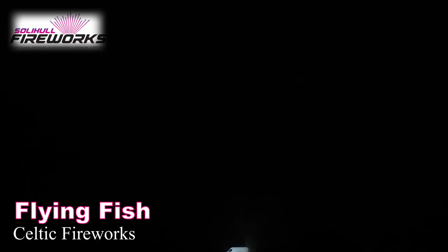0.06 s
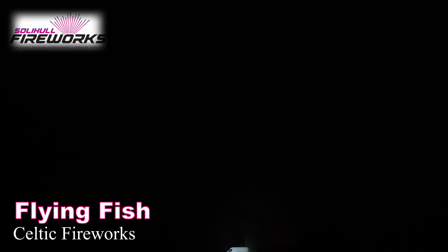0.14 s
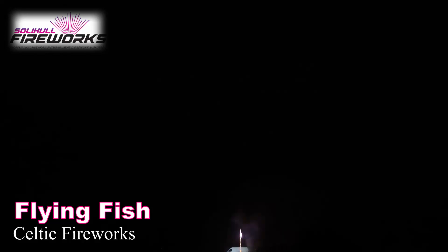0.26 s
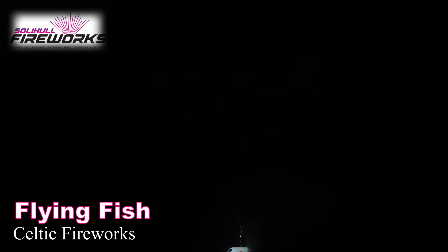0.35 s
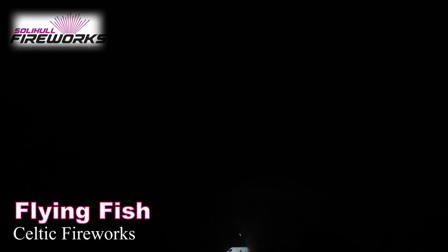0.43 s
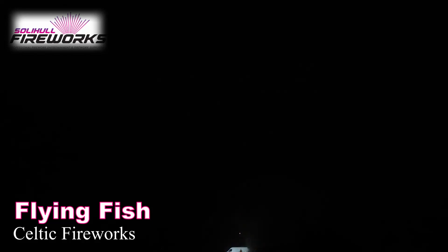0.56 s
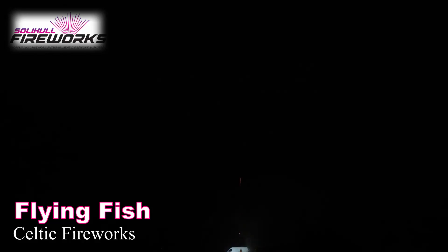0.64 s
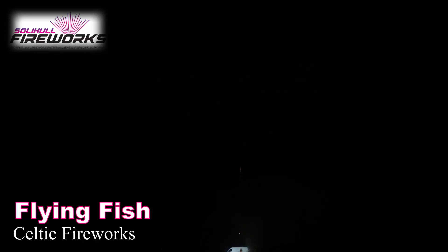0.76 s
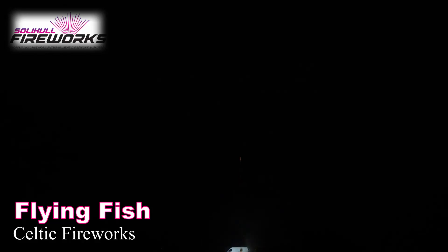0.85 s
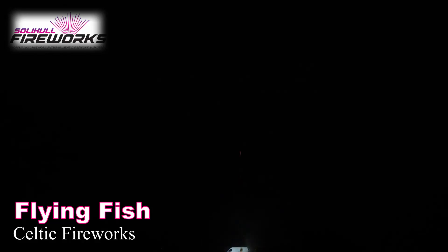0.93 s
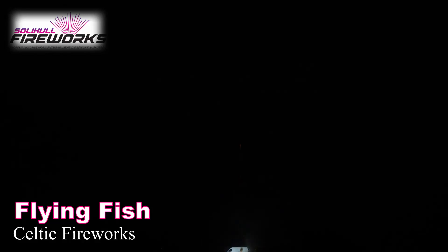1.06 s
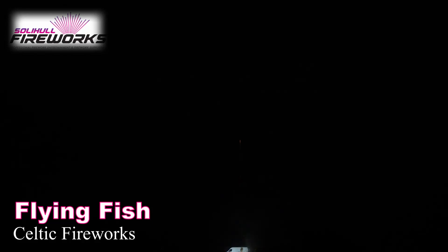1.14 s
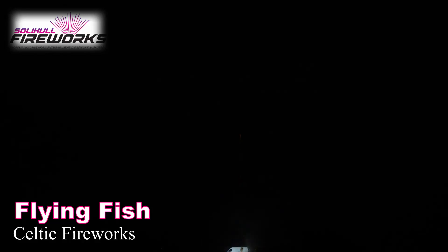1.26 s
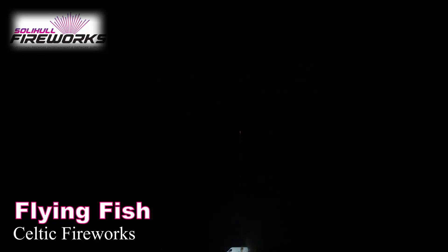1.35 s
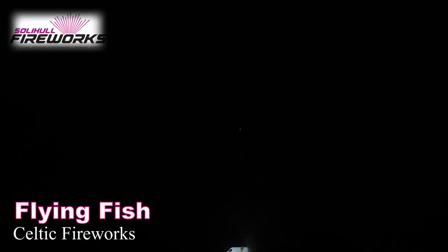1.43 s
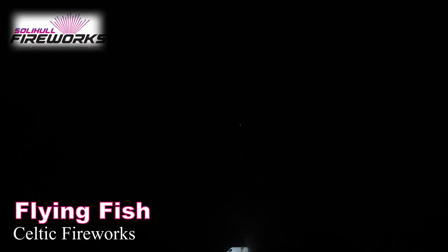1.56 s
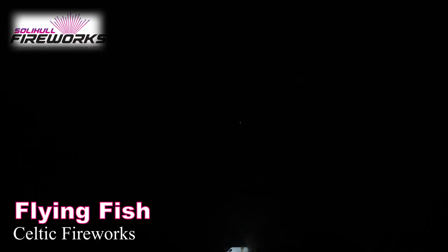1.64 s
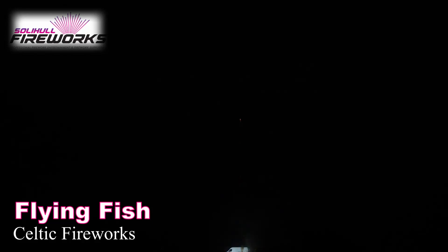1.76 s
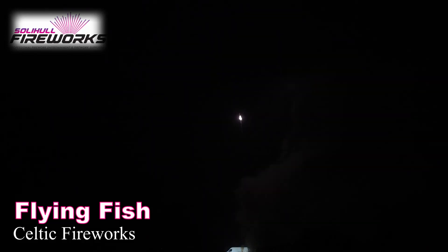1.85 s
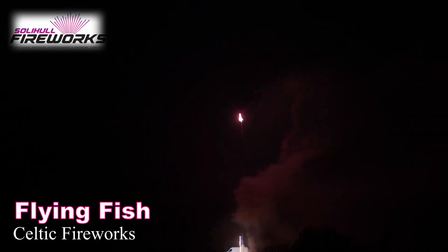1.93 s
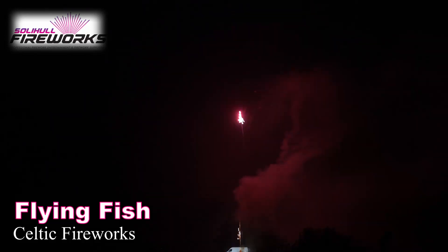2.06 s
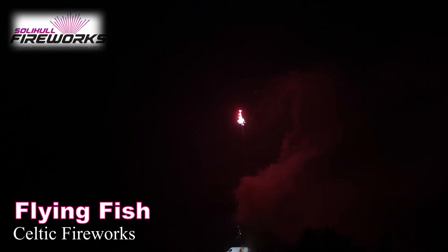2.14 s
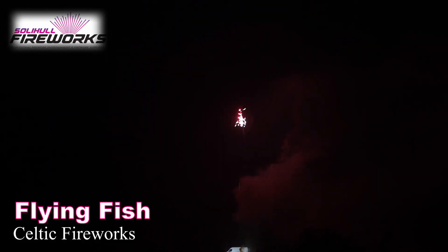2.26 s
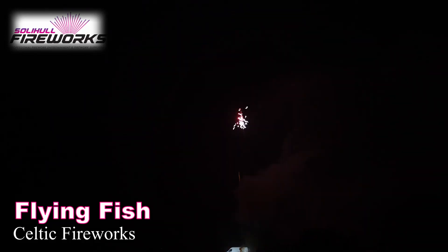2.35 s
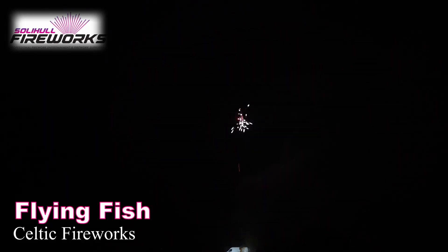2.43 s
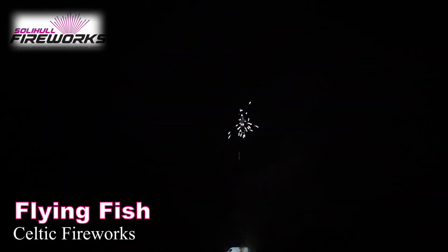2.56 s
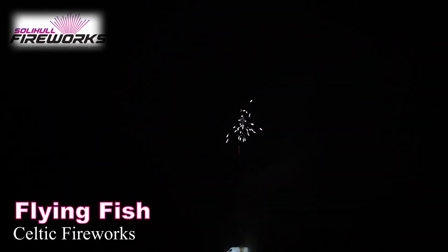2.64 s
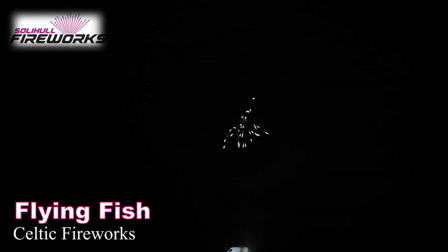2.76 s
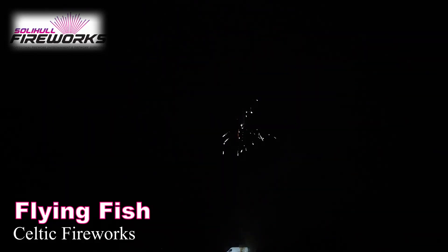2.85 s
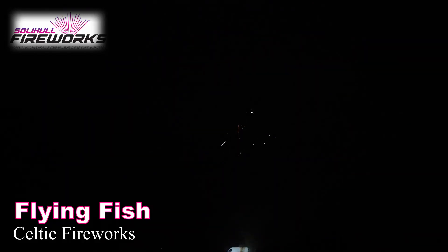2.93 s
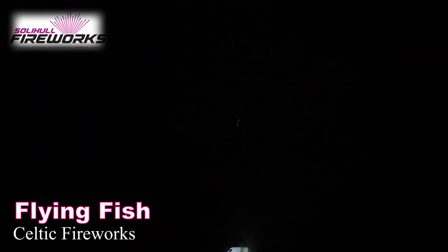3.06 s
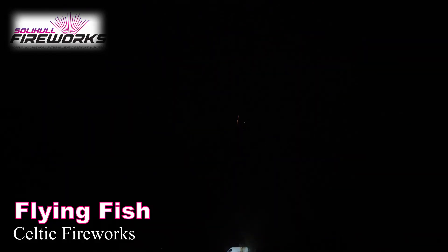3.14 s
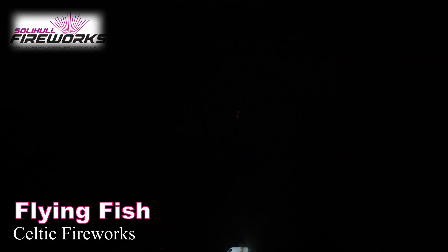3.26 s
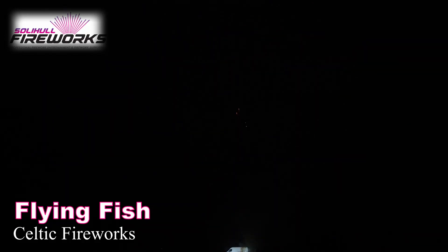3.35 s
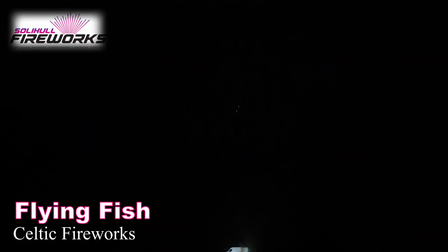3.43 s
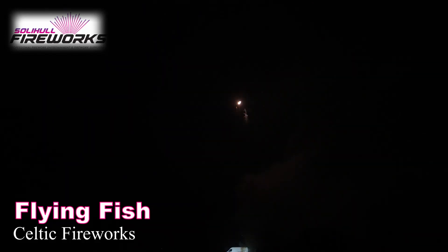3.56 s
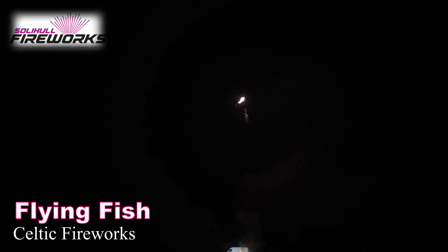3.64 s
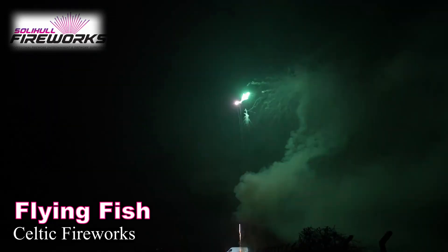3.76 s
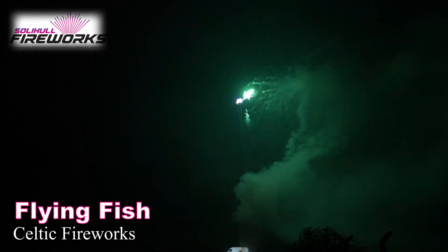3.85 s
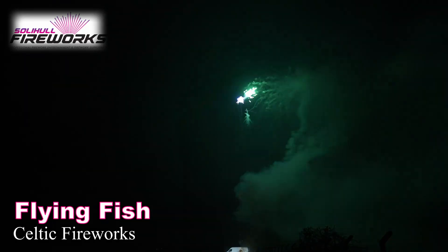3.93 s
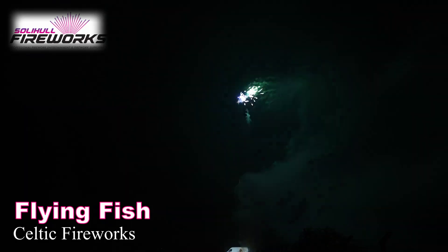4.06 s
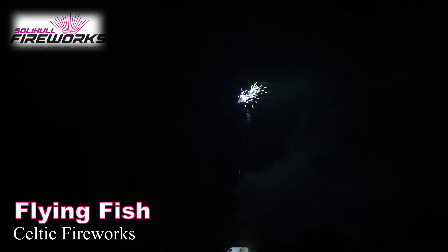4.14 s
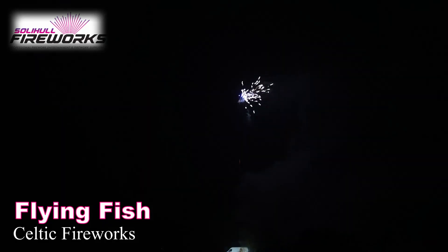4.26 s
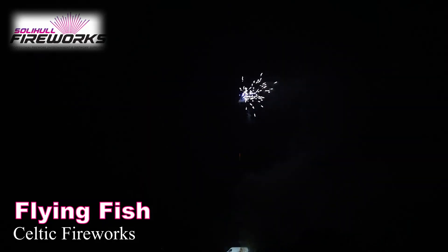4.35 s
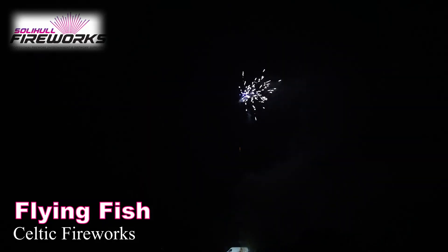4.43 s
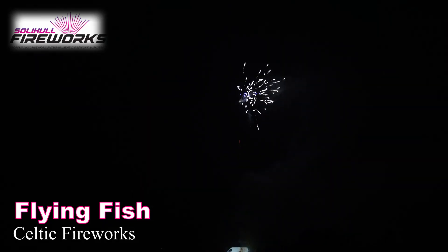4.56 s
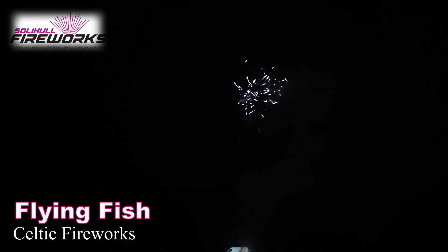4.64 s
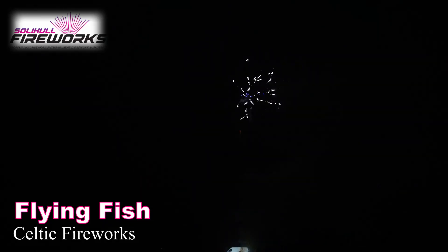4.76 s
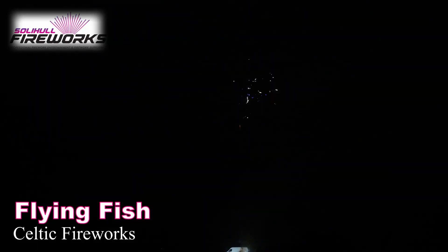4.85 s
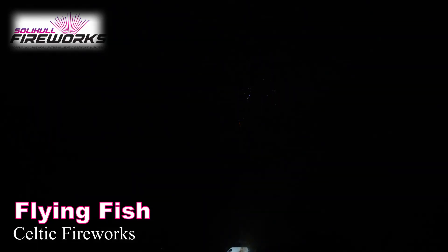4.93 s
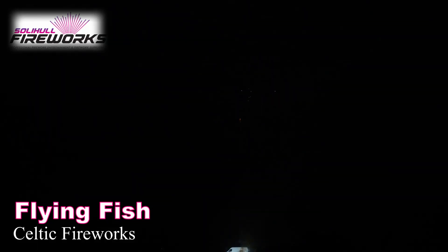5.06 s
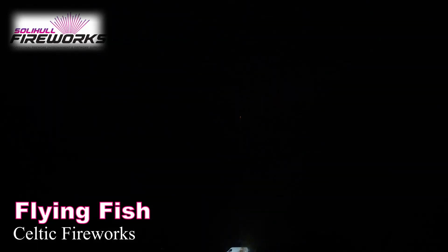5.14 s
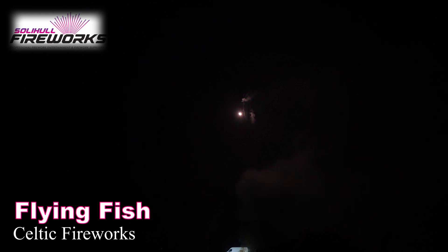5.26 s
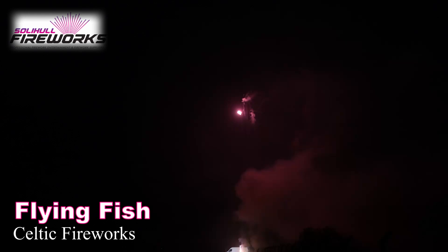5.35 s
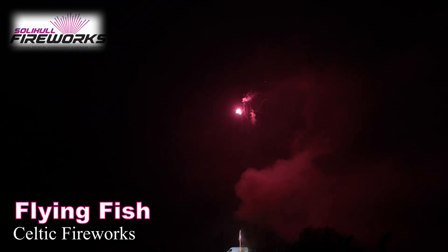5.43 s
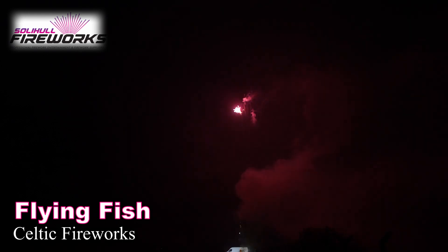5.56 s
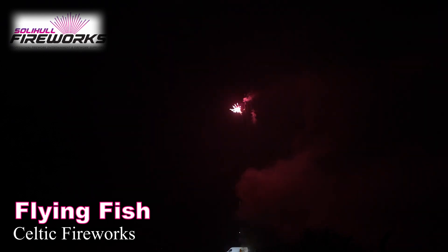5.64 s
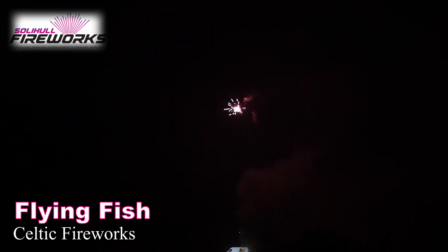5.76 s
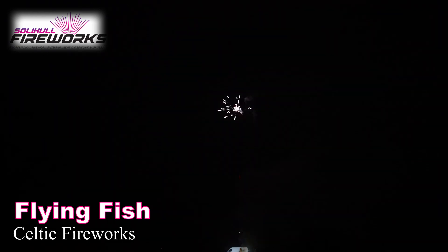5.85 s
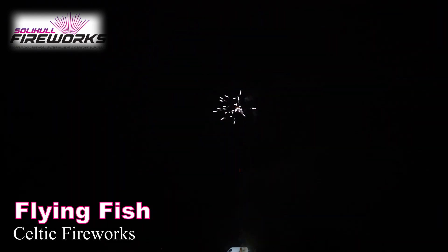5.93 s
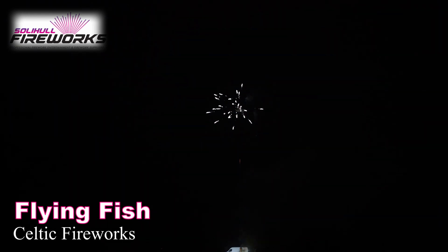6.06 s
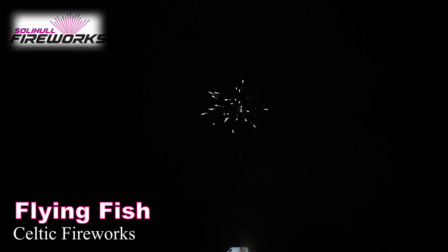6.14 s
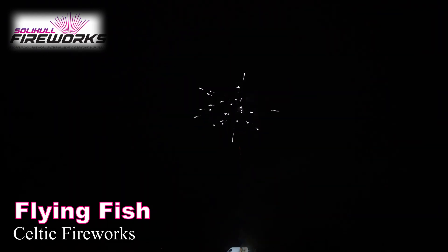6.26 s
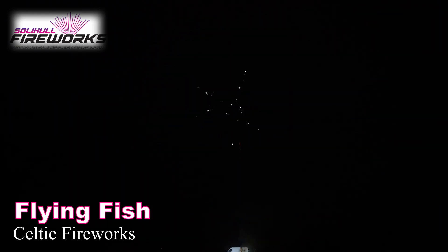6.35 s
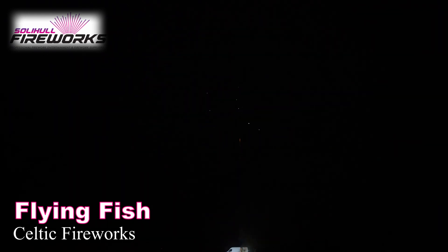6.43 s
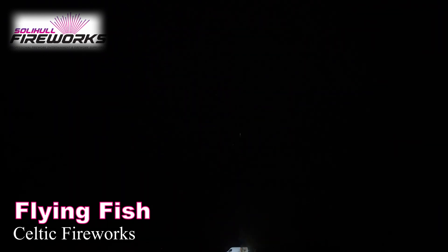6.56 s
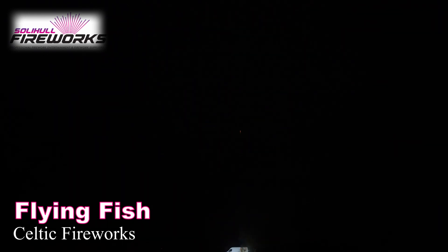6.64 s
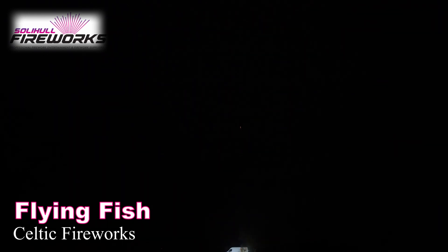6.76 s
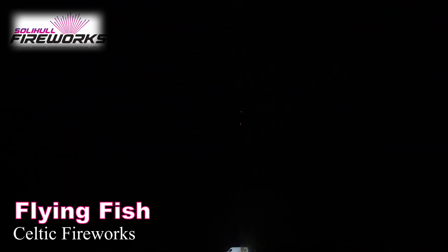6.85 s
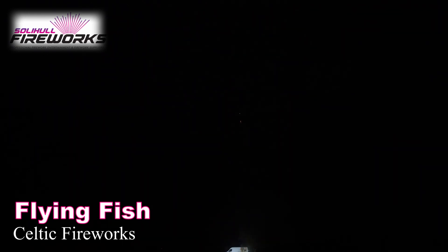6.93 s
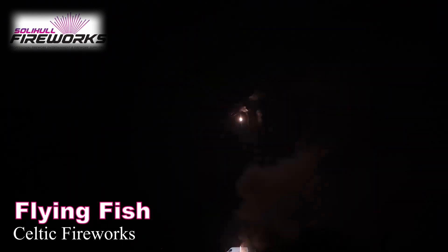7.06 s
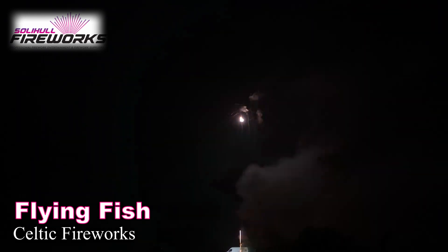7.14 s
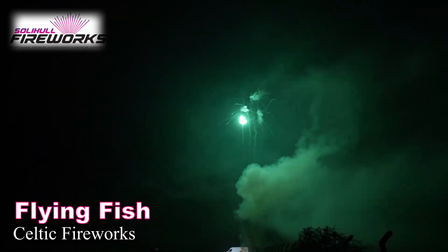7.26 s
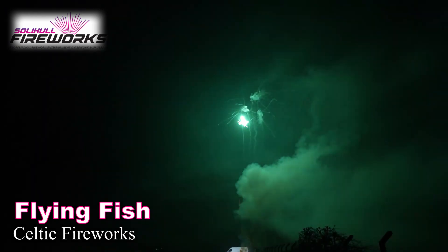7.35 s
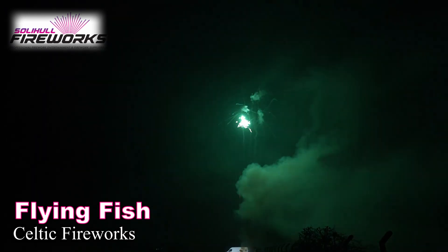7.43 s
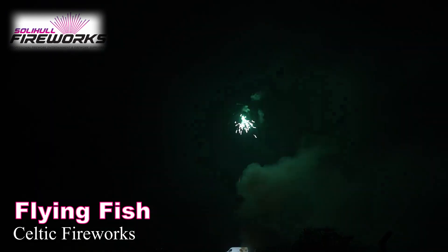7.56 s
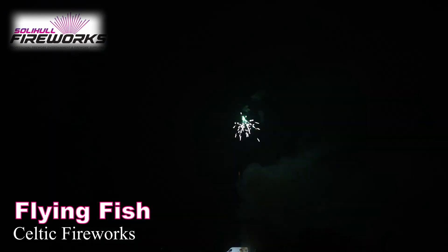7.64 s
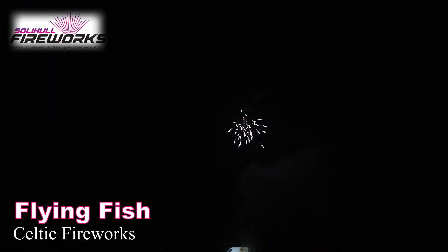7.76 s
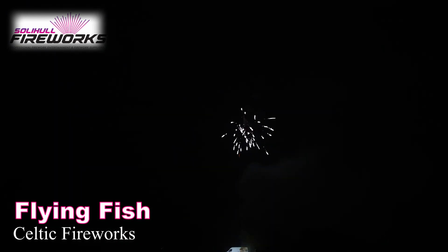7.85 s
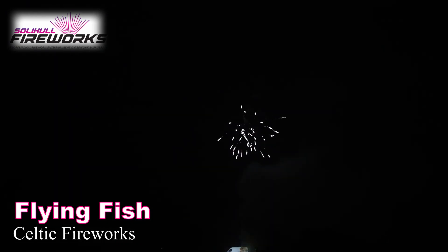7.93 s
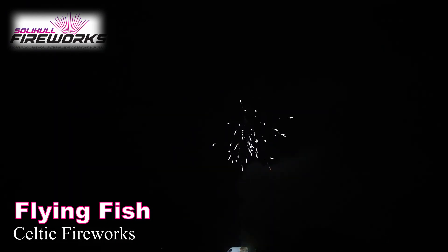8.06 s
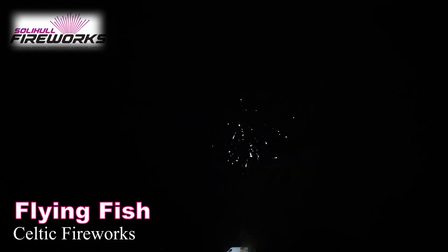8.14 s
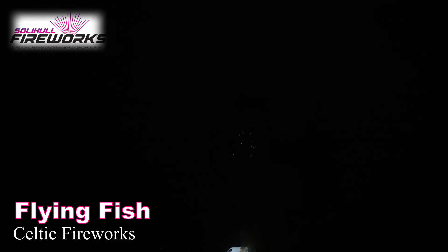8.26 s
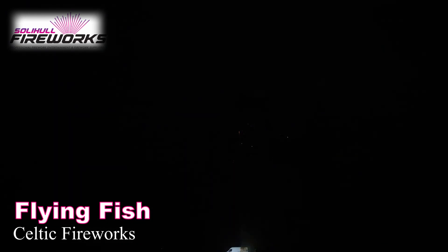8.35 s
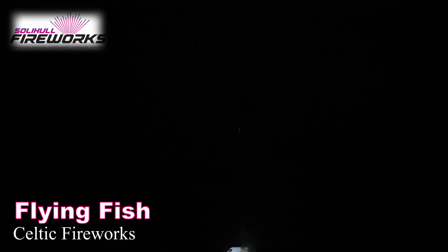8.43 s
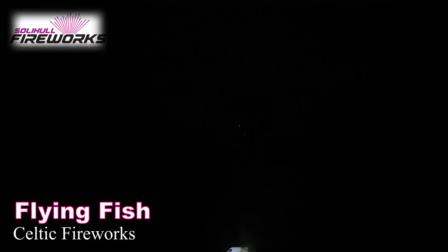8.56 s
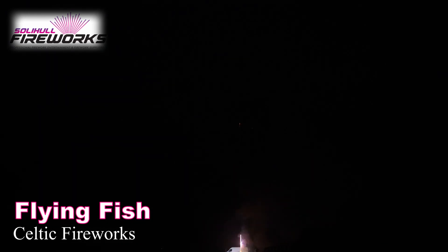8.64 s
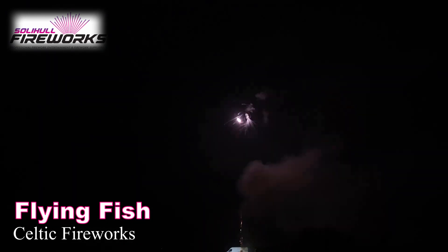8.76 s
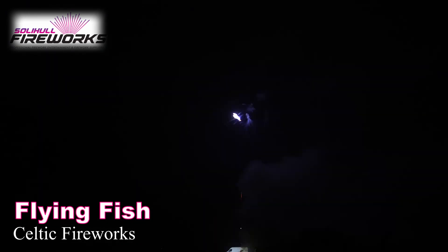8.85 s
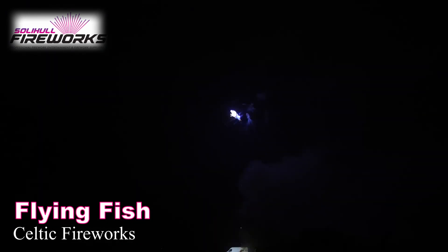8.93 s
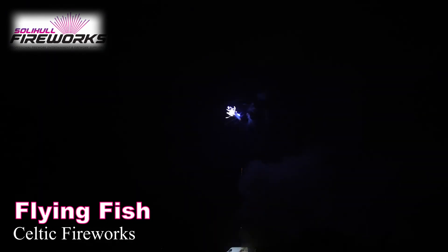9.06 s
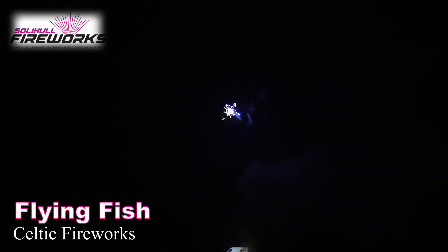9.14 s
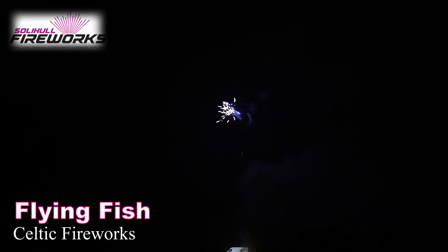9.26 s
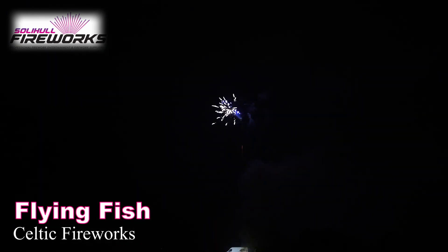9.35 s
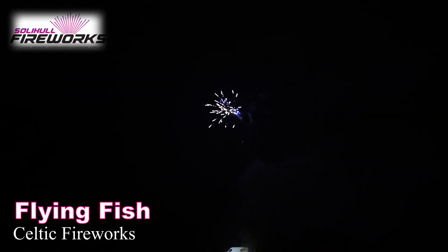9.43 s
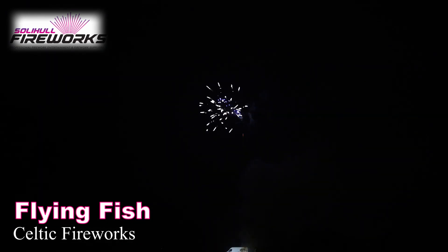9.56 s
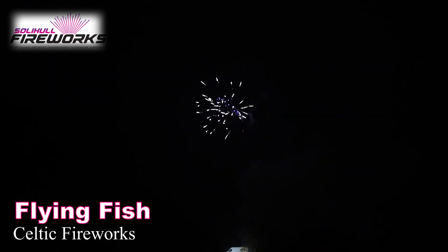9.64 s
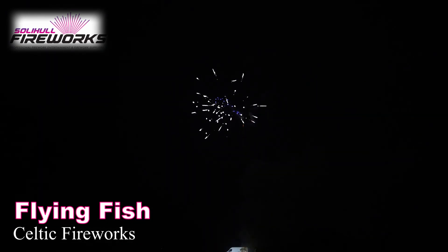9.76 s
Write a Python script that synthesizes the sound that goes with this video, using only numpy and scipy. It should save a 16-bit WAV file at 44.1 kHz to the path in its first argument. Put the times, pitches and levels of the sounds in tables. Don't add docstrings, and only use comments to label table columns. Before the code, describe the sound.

Outdoors at night, close to one overloaded microphone, a firework tube bangs abruptly and its low echo rolls away. A tight double bang follows, then single shots at regular gaps. Between them come sharp overhead pops and crisp spark hiss, once with a spinning whirr. Dull casings drop before the last boom, which leaves pure sizzling sparks and a soft ember fizz.

```python
import sys
import numpy as np
from scipy import signal
from scipy.fft import rfft, irfft, next_fast_len
from scipy.io import wavfile
from scipy.ndimage import map_coordinates

SR = 44100
rng = np.random.default_rng(int(sys.argv[2]) if len(sys.argv) > 2 else 0)


def magnitude_from_level(level_db):
    exponent = np.asarray(level_db, float) / 20
    return 10 ** exponent


def bounce(signal):
    frames = np.transpose(np.atleast_2d(signal))
    limited = np.clip(frames, -1, 1)
    pcm = np.round(limited * 32767).astype(np.int16)
    wavfile.write(sys.argv[1], SR, pcm)


N = 432180
T = np.arange(N) / SR

# freq_hz, density_db
NIGHT_COLOUR = [(12, -26), (20, -6.5), (44, -7.5), (91, -4), (123, -12), (222, -17.5), (367, -25),
                (513, -21.5), (558, -25.5), (825, -23.5), (949, -20.5), (1030, -22.5), (1400, -30.5),
                (3530, -39.5), (16000, -64.5)]
# freq_hz, density_db
EMBER_COLOUR = [(710, -34), (1200, -2), (1370, -10.5), (1730, -5), (2570, -8), (3560, -3.5), (4360, -5.5),
                (5600, -15), (9610, -29), (12000, -33), (15600, -65)]
# time_s, level_db
EMBER_LEVEL = [
    (0, -76.5),
    (2.1, -68.5),
    (3.3, -75.5),
    (3.8, -64.5),
    (5.3, -75.5),
    (6.7, -67.5),
    (7.3, -65),
    (8.45, -65.5),
    (8.8, -62),
    (9.8, -56.5),
]
# pitch_hz, level_db
WHINE = (942.1, -71.5)
# start_s, end_s, pitch_hz, level_db
HUM = (6.25, 7.25, 522.5, -60.5)
# start_s, charge_db, crack_sharpness_db
SHOTS = [
    (0.441, 1, 0),
    (2.1563, 2, -2),
    (2.2062, 3, 2),
    (3.9024, 1.5, 1),
    (5.594, 0, -1.5),
    (7.319, 0, -1),
    (8.8395, 2, -1.5),
]
# lead_s, level_db
SPIT = (.005, -46.5)
# ring_hz, decay_cycles, level_db, blast_s, blast_share
MUZZLE = (275, 2.5, 29.5, .0006, 1.56)
# delay_s, level_db, front_lost_s
WALL = (.0343, -10.7, .0009)
# delay_s, level_db, pitch_hz
NEAR_ECHOES = [(0.0068, 19.1, 335), (0.0083, 13.0, 346), (0.0143, -10.2, 182), (0.0188, -2.1, 273),
               (0.0267, -10.1, 252), (0.0369, 1.9, 191), (0.0376, -6.1, 139), (0.0488, -8.2, 228),
               (0.0503, -9.4, 329), (0.0641, -18.2, 190), (0.0725, -18.3, 188), (0.0878, -16.9, 218),
               (0.1013, -21.5, 247), (0.1113, -26.1, 248), (0.1229, -11.7, 270), (0.1243, -17.1, 417),
               (0.1345, -26.6, 172), (0.1452, -26.2, 181), (0.157, -19.3, 209), (0.1606, -25.3, 206)]
# delay_s, level_db, pitch_hz
FAR_ECHOES = [(0.2161, -43.5, 215), (0.2302, -29.5, 251.3), (0.256, -26.5, 181.8), (0.3041, -35.5, 212),
              (0.3253, -26, 224), (0.3382, -34, 250), (0.3494, -27.5, 193), (0.3832, -31.5, 150),
              (0.4152, -28.5, 248), (0.4348, -27, 232), (0.4759, -37.5, 225), (0.5342, -35.5, 188.5),
              (0.5681, -31.5, 178), (0.602, -25.5, 150), (0.6566, -32.5, 179), (0.661, -26, 255),
              (0.7288, -25, 202), (0.742, -28.5, 197), (0.7939, -37, 235), (0.8425, -37.5, 221)]
# delay_s, level_db, lowest_hz, spacing_hz, t60_s
RIBS = [
    (.0335, -7, 2100, 1300, .014),
        (.1215, -34.5, 561, 1480, 0.035),
    (.156, -40.5, 2190, 2000, 0.015),
    (.2505, -35.5, 897, 882, 0.046),
    (.6043, -30, 797, 875, 0.015),
    (.657, -46, 890.6, 890, 0.018),
    (.699, -41, 830, 890, 0.012),
]
# freq_hz, density_db
BOOM_COLOUR = [(15, -47.5), (25, -23.5), (75, -17), (150, 3.5), (237, 0), (321, -6), (424, -25.5),
               (520, -28.5), (680, -55), (1140, -120)]
# freq_hz, density_db
RUSTLE_COLOUR = [(250, -40.5), (420, -14), (542, -5.5), (613, -2), (978, -1), (1080, -2), (1310, -8),
                 (1690, -5), (1800, -7.5), (1970, -7), (2200, -10.5), (3680, -15.5), (6000, -38.5),
                 (7800, -60.5), (13200, -120)]
# freq_hz, density_db
SIZZLE_COLOUR = [(650, -39.5), (1100, -8.5), (1710, -8), (1980, -3), (2430, 2), (2750, -3.5), (3870, -2),
                 (12200, -28.5), (14700, -47), (16500, -66)]
# peak_s, rise_s, level_db, fall_db_per_s
BOOM_BACK = [
    (.06, .02, -29, 149),
    (.2, 0.078, -43, 25),
    (.39, 0.3, -44.5, 26),
]
RUSTLE_BACK = [
    (.005, .006, -20, 596),
    (0.04, .01, -31, 252),
    (0.111, .05, -57.5, 40.7),
    (0.384, 0.39, -47.5, 32),
]
SIZZLE_BACK = [
    (.006, .006, -39.5, 420),
    (.037, .004, -41.5, 280),
    (.062, .03, -42, 380),
    (.12, 0.073, -67, 25),
    (.245, 0.034, -61.5, 90),
    (.5, .3, -80.5, 5.2),
]
# start_s, peak_db
TICKS = [
    (1.1943, -41.5),
    (1.198, -48),
    (2.04, -46),
    (2.055, -49.5),
    (2.08, -48.5),
]
# freq_hz, density_db
TICK_COLOUR = [(1200, -45.0), (2000, 1), (2800, -10.5), (4000, 0.5), (5500, -15), (16000, -15.5)]
# start_s, peak_db, pulse_s, ground_delay_s
POPS = [
    (2.1056, -29, 0.00038, 0.0037),
    (2.1146, -26, 0.0018, 0.0033),
    (2.1156, -25.5, 0.00057, .004),
    (3.8365, -8, 0.000084, 0.0041),
    (3.838, -13, 0.00081, .0043),
    (3.9897, -13, 0.00031, 0.0037),
    (5.5279, -13, 0.00028, 0.004),
    (9.0019, -17.5, 0.000073, 0.0027),
    (9.0029, -17, 0.00049, 0.004),
]
# lit_s, out_s, hiss_db, whirr_rel_db
SPARKS = [
    (2.11, 3.15, -65.5, -18),
    (3.84, 5.07, -61.5, -14),
    (5.527, 6.572, -64, -19),
    (7.35, 8.366, -64.5, -2),
    (7.665, 8.39, -73, 2.5),
    (8.307, 8.9, -87, 12.5),
    (8.979, 10.095, -65, -25),
]
# freq_hz, density_db
HISS_COLOUR = [(760, -33.5), (1300, -1), (1370, -3.5), (1500, -6), (1840, -7.5), (1980, -9.5), (2400, -4.5),
               (3810, 0.5), (4970, -11), (8040, -14.5), (12500, -27.5), (15000, -35)]
# freq_hz, density_db
WHIRR_COLOUR = [(1300, -41.0), (1550, -7.5), (1900, -9.5), (2200, -10.5), (2600, -39.0)]
# start_s, level_db, pitch_hz, t60_s
KNOCKS = [
    (7.988, -36, 400, .04),
    (8.393, -30.5, 404, 0.013),
    (8.3935, -40, 1850, 0.032),
    (8.393, -41, 1300, 0.015),
]

NIGHT_DB, NIGHT_FOLLOWS_DB_PER_DB = -60, 0.18
RIB_STEP_DB, AIR_DULLS_DB_PER_S = -2.5, -4
CATCH_S, DIM_DB_PER_S, OUT_DB_PER_S = 0.073, 9, 200


def unit(x):
    return x / np.sqrt(np.mean(x ** 2) + 1e-20)


def noise(colour, size=N):
    m = next_fast_len(size + 8192)
    hz, db = np.transpose(colour)
    gain = magnitude_from_level(np.interp(np.log(np.fft.rfftfreq(m, 1 / SR) + 1), np.log(hz + 1), db))
    return unit(irfft(rfft(rng.standard_normal(m)) * gain, m)[:size])


def wander(rate_hz, size):
    points = rng.standard_normal(int(size / SR * rate_hz) + 8)
    return map_coordinates(points, [T[:size] * rate_hz])


def add(x, start_s, sound):
    part = x[round(start_s * SR):][:len(sound)]
    part += sound[:len(part)]


def night():
    fizz_db = np.interp(T, *np.transpose(EMBER_LEVEL))
    fizz = magnitude_from_level(fizz_db - 6.5 + 3.5 * wander(7, N)) * noise(EMBER_COLOUR)
    air = magnitude_from_level(NIGHT_DB + NIGHT_FOLLOWS_DB_PER_DB * (fizz_db - fizz_db.mean())) * noise(NIGHT_COLOUR)
    whine_hz, whine_db = WHINE
    whine = magnitude_from_level(whine_db) * np.sin(2 * np.pi * whine_hz * T)
    start_s, end_s, hum_hz, hum_db = HUM
    fade = np.clip((T - start_s) / 0.05, 0, 1) * (T < end_s) * magnitude_from_level(-11 * (T - start_s))
    hum = magnitude_from_level(hum_db) * fade * np.sin(2 * np.pi * hum_hz * T)
    return air + fizz + whine + hum


def blast(t, length_s):
    return (1 - t / length_s) * np.exp(-t / length_s)


def lift():
    near, far, t = np.zeros(2 * SR), np.zeros(2 * SR), T[:SR // 10]
    ring_hz, cycles, charge_db, blast_s, share = MUZZLE
    ring = np.cos(2 * np.pi * ring_hz * t) * magnitude_from_level(-60 * t * ring_hz / cycles)
    charge = magnitude_from_level(charge_db) * (ring + share * blast(t, blast_s))
    add(near, 0, charge)
    wall_s, wall_db, front_lost_s = WALL
    dulled = signal.lfilter(*signal.butter(2, 1500, fs=SR), charge * (t > front_lost_s))
    add(near, wall_s, magnitude_from_level(wall_db) * dulled)
    for x, echoes in (near, NEAR_ECHOES), (far, FAR_ECHOES):
        for delay_s, db, hz in echoes:
            rounded_front = 1 - np.exp(-4 * t * hz)
            add(x, delay_s, magnitude_from_level(db - 60 * t * hz / 6) * np.sin(2 * np.pi * hz * t) * rounded_front)
    far = signal.lfilter(*signal.butter(2, 65, "high", fs=SR), far)
    return near + signal.lfilter(*signal.iirnotch(440, 4, SR), far)


def faces():
    x, t, step = np.zeros(2 * SR), T[:SR // 20], np.arange(3)[:, None]
    for delay_s, db, lowest_hz, spacing_hz, t60_s in RIBS:
        uneven_db = rng.normal(0, 1.5, step.shape)
        tone_db = (RIB_STEP_DB + AIR_DULLS_DB_PER_S * delay_s) * step ** 2 + uneven_db
        comb = magnitude_from_level(tone_db) * np.sin(2 * np.pi * (lowest_hz + spacing_hz * step) * t)
        rough = 1 + 0.45 * noise(RUSTLE_COLOUR, len(t))
        envelope = magnitude_from_level(db - 60 * t / t60_s) * (1 - np.exp(-40 * t / t60_s))
        add(x, delay_s, envelope * comb.sum(axis=0) * rough)
    return x


def swells(rows, t):
    power = np.zeros(len(t))
    for peak_s, rise_s, db, fall_db_per_s in rows:
        rise = np.clip(1 + (t - peak_s) / rise_s, 0, 1) ** 2
        power += (rise * magnitude_from_level(db - fall_db_per_s * np.maximum(t - peak_s, 0))) ** 2
    return np.sqrt(power)


def shots():
    size = 2 * SR
    lead_s, spit_db = SPIT
    t = T[:size] - lead_s
    boom, rustle, sizzle = (swells(rows, t) for rows in (BOOM_BACK, RUSTLE_BACK, SIZZLE_BACK))
    rustle = rustle + magnitude_from_level(spit_db) * (t < 0)
    rustle = rustle * magnitude_from_level(2.1 * wander(120, size))
    boom = boom * magnitude_from_level(3.2 * wander(40, size))
    scatter = boom * noise(BOOM_COLOUR, size) + 0.65 * rustle * noise(RUSTLE_COLOUR, size)
    echoes, x = lift(), np.zeros(N)
    for start_s, db, sharp_db in SHOTS:
        fresh = 0.57 * rustle * noise(RUSTLE_COLOUR, size)
        fresh += magnitude_from_level(6.0 + sharp_db) * sizzle * noise(SIZZLE_COLOUR, size)
        add(x, start_s - lead_s, magnitude_from_level(db) * (scatter + fresh))
        add(x, start_s, magnitude_from_level(db) * (echoes + magnitude_from_level(sharp_db / 2) * faces()))
    return x


def ticks():
    x, t = np.zeros(N), T[:SR // 10]
    for start_s, db in TICKS:
        snap = magnitude_from_level(db - 4.0 - 60 * t / 0.016)
        wash = magnitude_from_level(db - 16 - 60 * t / 0.15)
        add(x, start_s, (snap + wash) * noise(TICK_COLOUR, len(t)))
    return x


def pops():
    x, t = np.zeros(N), T[:SR // 8]
    for start_s, db, pulse_s, ground_s in POPS:
        envelope = np.exp(-t / (2.2 * pulse_s)) * (1 - np.exp(-11 * t / pulse_s))
        pulse = magnitude_from_level(db + 3) * np.cos(np.pi / 2 * t / pulse_s) * envelope
        add(x, start_s - 0.0001, pulse)
        add(x, start_s + ground_s - 0.0001, magnitude_from_level(-1) * pulse)
        scatter = noise(RUSTLE_COLOUR, len(t)) + 0.5 * noise(SIZZLE_COLOUR, len(t))
        scatter += 1.6 * noise(BOOM_COLOUR, len(t))
        add(x, start_s, magnitude_from_level(db - 35.5 - 60 * t / 0.2) * scatter)
    dulled = signal.lfilter(*signal.butter(1, 5000, fs=SR), x)
    w = 2 * np.pi * 3800
    housing = signal.bilinear([w * w], [1, w / 1.4, w * w], SR)
    return signal.lfilter(*housing, dulled)


def sparks():
    hiss, whirr, x = noise(HISS_COLOUR), noise(WHIRR_COLOUR), np.zeros(N)
    for lit_s, out_s, db, whirr_db in SPARKS:
        burn_db = db - DIM_DB_PER_S * (T - lit_s) - OUT_DB_PER_S * np.maximum(T - out_s, 0)
        catch = np.clip((T - lit_s) / CATCH_S, 0, 1)
        x += catch * magnitude_from_level(burn_db) * (hiss + magnitude_from_level(whirr_db) * whirr)
    return magnitude_from_level(8 + 2.4 * wander(SR / 100, N)) * x


def knocks():
    x, t = np.zeros(N), T[:SR // 10]
    for start_s, db, hz, t60_s in KNOCKS:
        envelope = magnitude_from_level(db - 60 * t / t60_s) * (1 - np.exp(-t / 0.00045))
        add(x, start_s, envelope * np.sin(2 * np.pi * hz * t))
    return x


def scene():
    return (night() + shots() + ticks() + pops() + sparks() + knocks())[None]


def top_cut(x):
    return signal.sosfilt(signal.butter(12, 17000, fs=SR, output="sos"), x)


def record(dry):
    clipped = np.clip(dry, -0.385, 0.385)
    sagging = signal.lfilter([1, -1], [1, -np.exp(-2 * np.pi * 33 / SR)], clipped)
    rounded = signal.lfilter(*signal.butter(1, 9000, fs=SR), sagging)
    hissing = rounded + magnitude_from_level(-87.5) * rng.standard_normal(dry.shape)
    mix = signal.sosfilt(signal.cheby2(10, 40, 16800, fs=SR, output="sos"), hissing)
    return top_cut(mix)


dry = scene()
out = record(dry)
bounce(out)
```